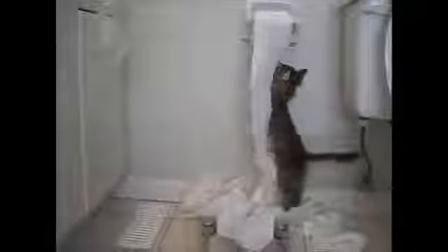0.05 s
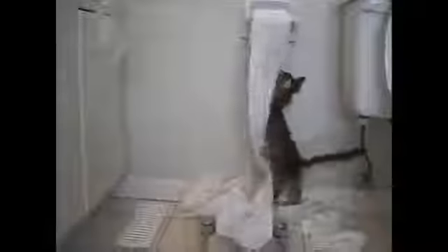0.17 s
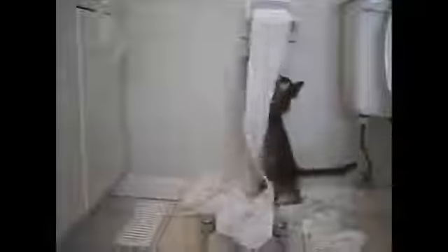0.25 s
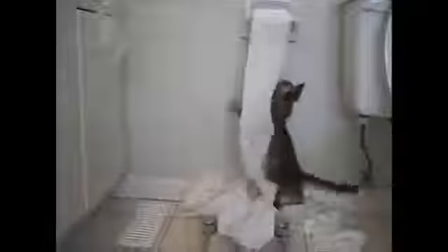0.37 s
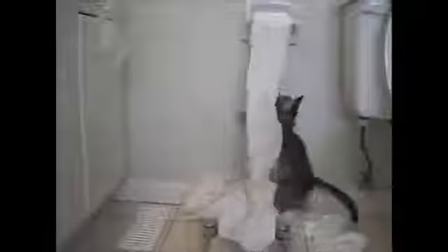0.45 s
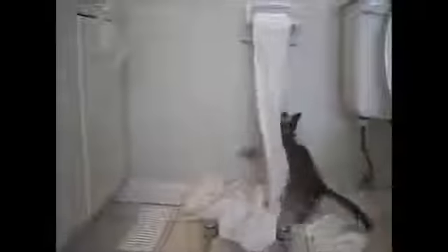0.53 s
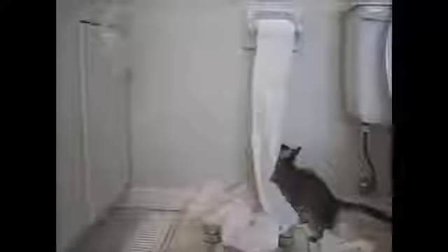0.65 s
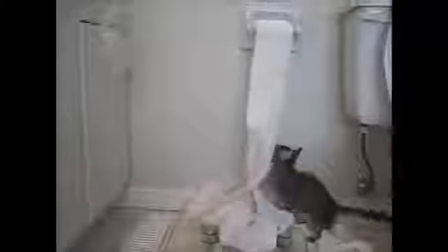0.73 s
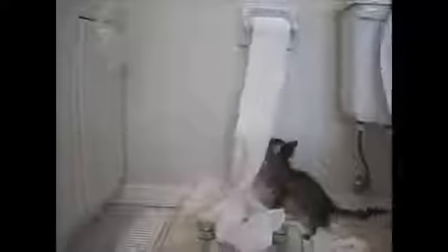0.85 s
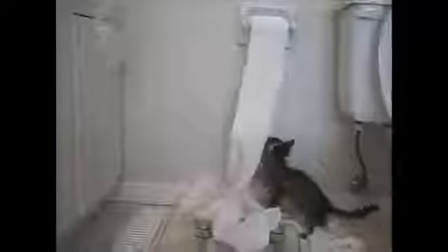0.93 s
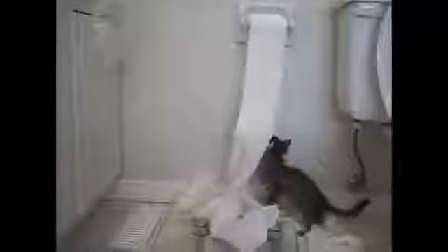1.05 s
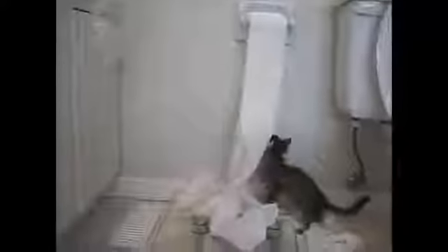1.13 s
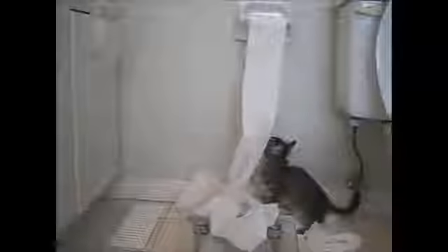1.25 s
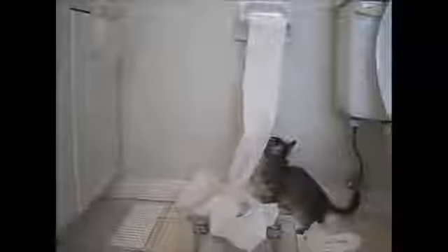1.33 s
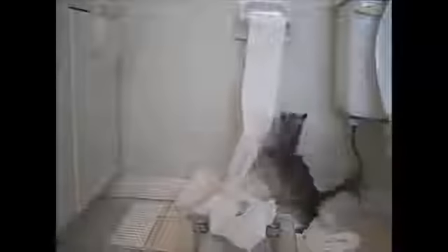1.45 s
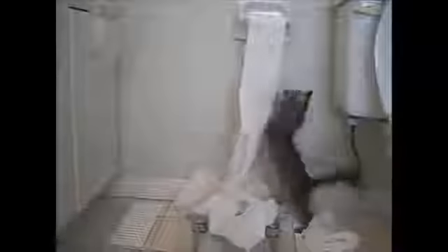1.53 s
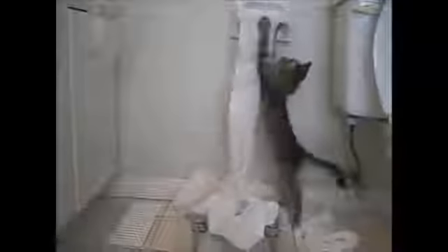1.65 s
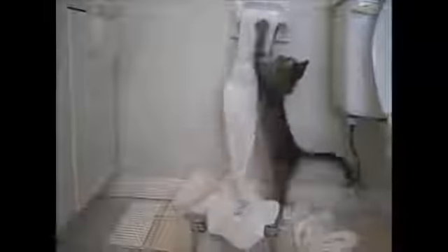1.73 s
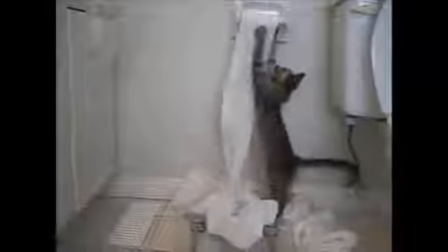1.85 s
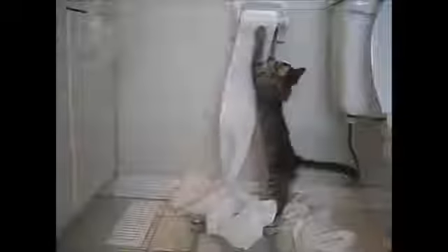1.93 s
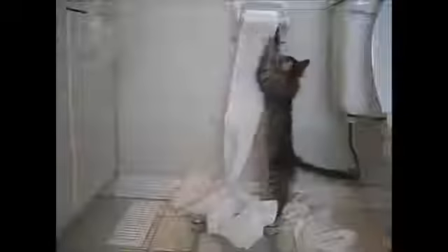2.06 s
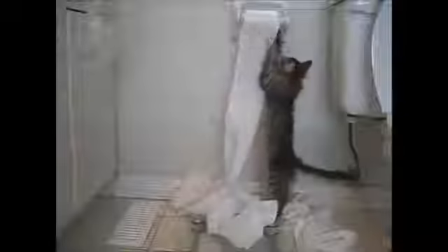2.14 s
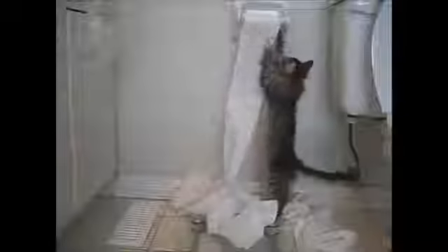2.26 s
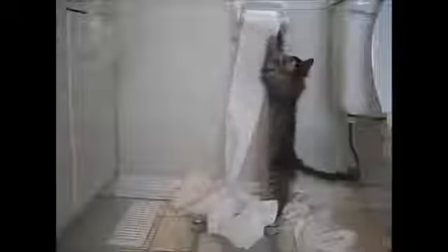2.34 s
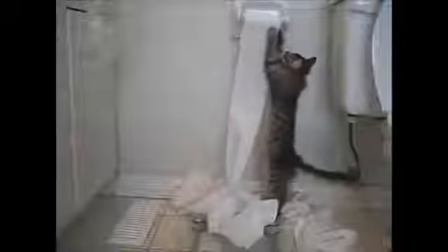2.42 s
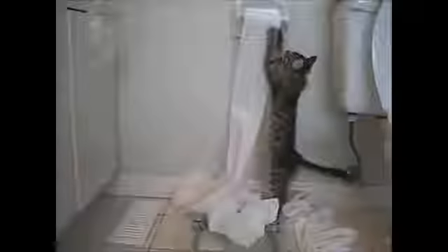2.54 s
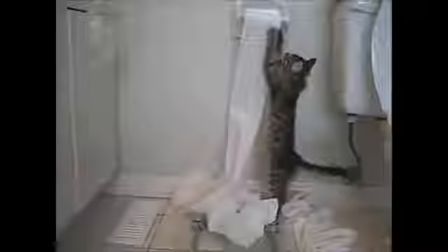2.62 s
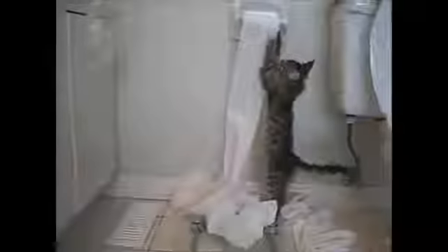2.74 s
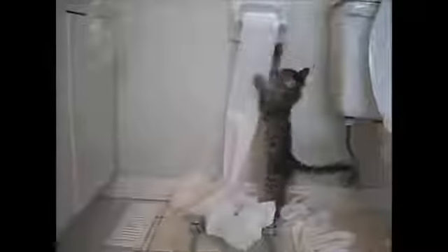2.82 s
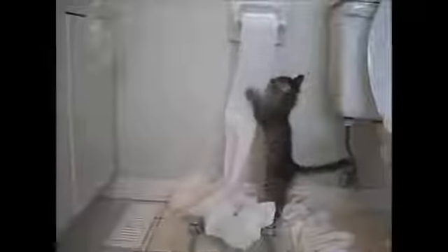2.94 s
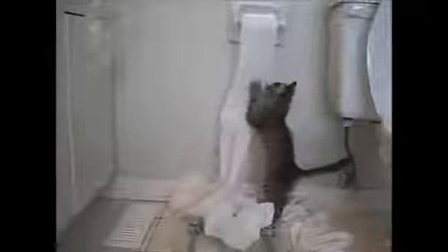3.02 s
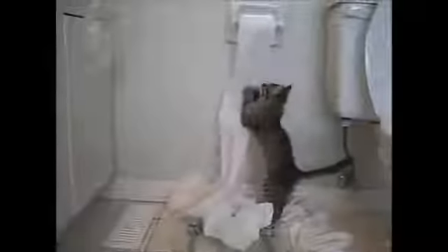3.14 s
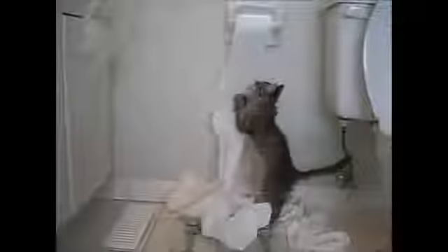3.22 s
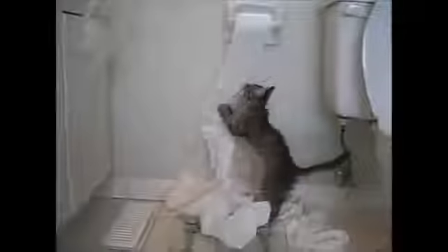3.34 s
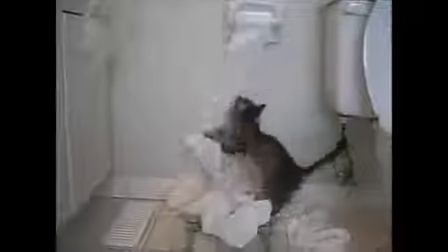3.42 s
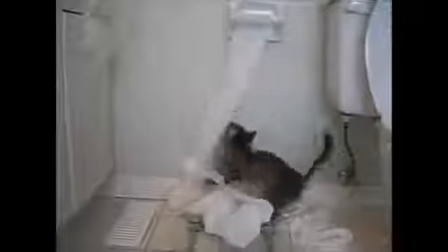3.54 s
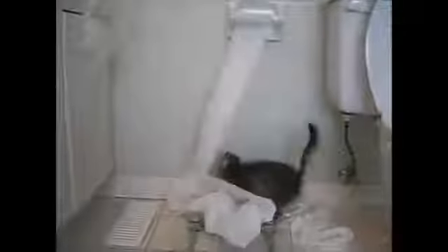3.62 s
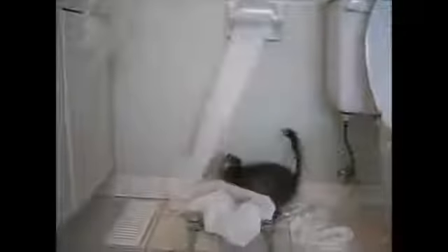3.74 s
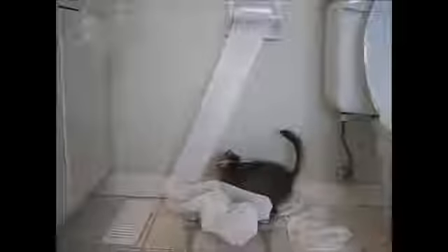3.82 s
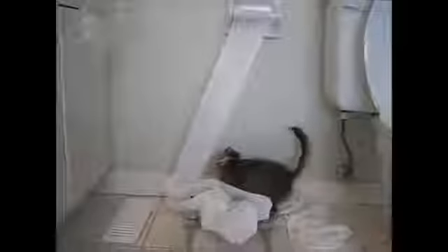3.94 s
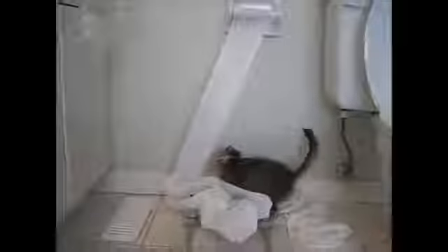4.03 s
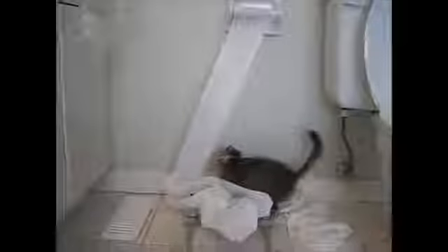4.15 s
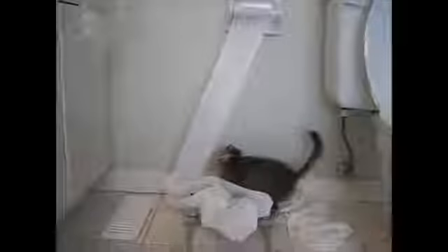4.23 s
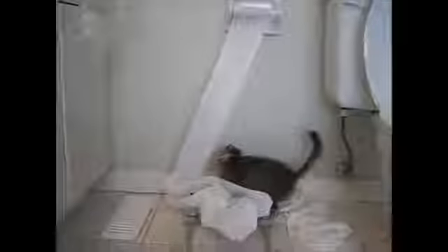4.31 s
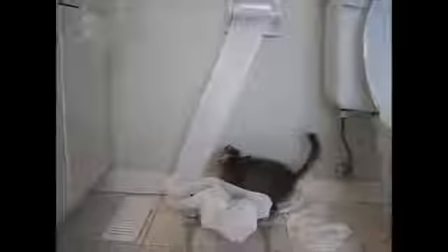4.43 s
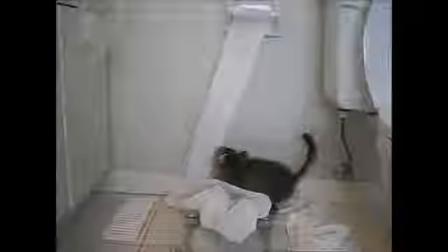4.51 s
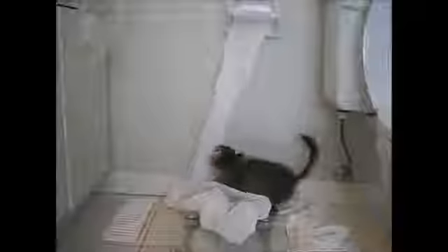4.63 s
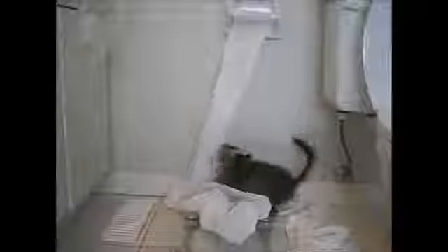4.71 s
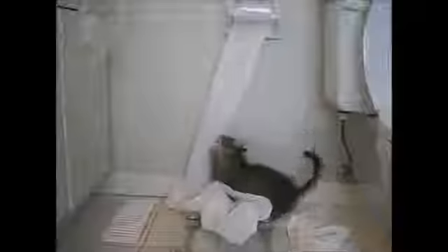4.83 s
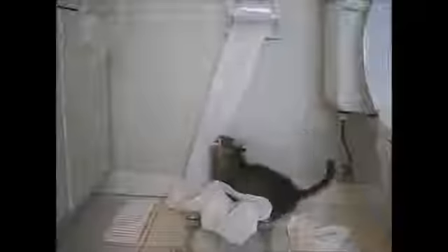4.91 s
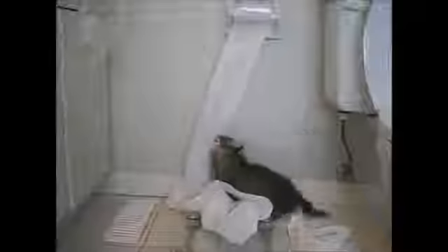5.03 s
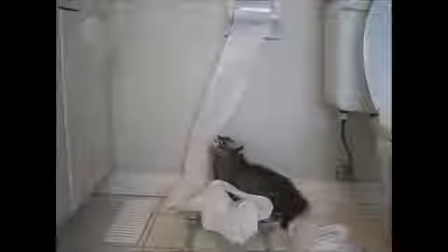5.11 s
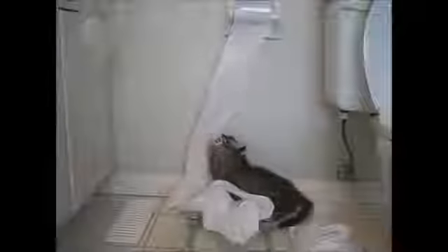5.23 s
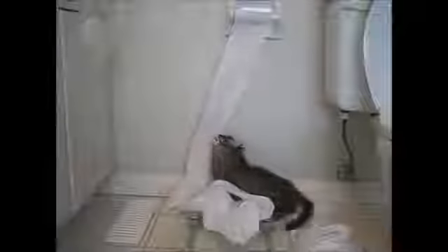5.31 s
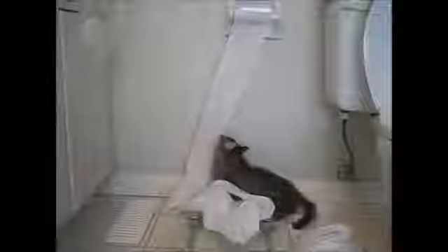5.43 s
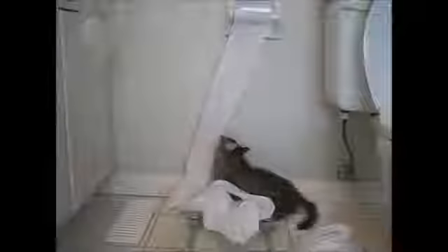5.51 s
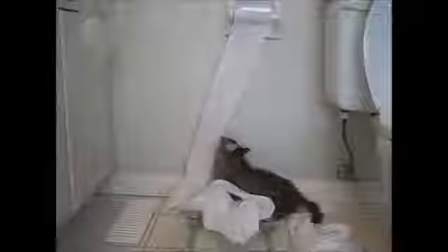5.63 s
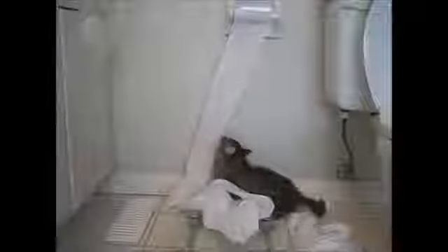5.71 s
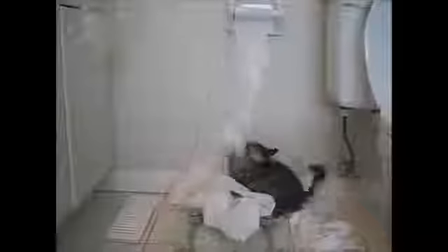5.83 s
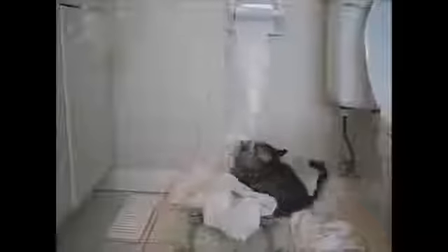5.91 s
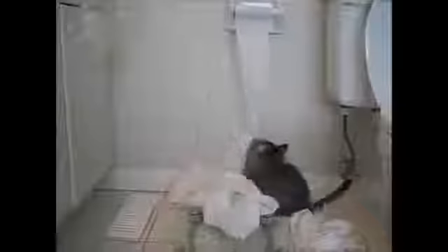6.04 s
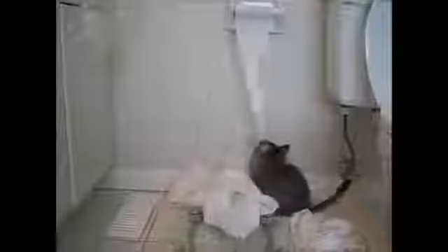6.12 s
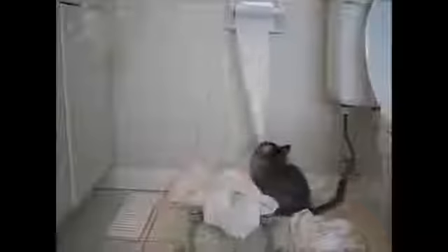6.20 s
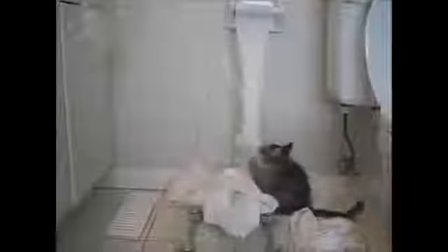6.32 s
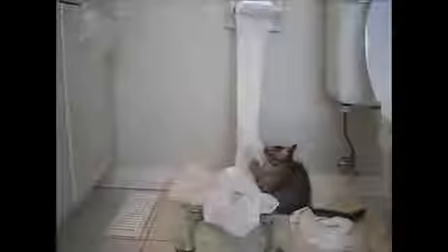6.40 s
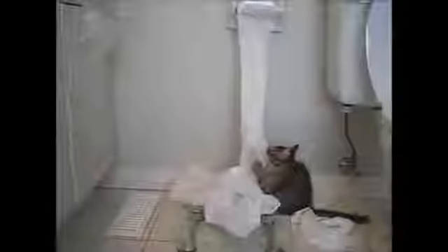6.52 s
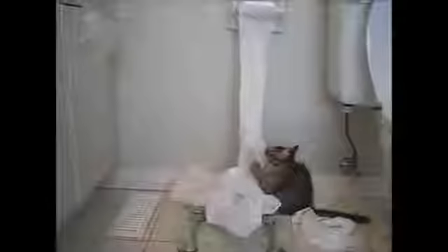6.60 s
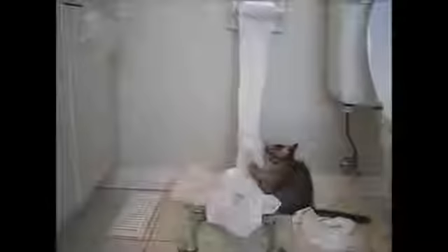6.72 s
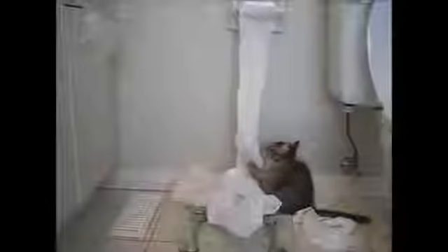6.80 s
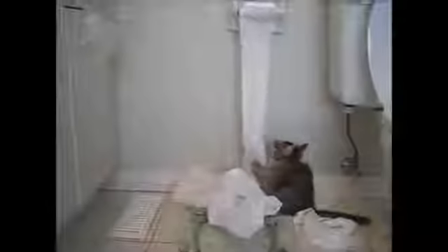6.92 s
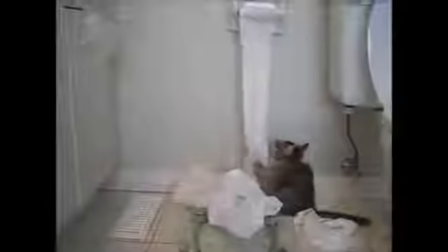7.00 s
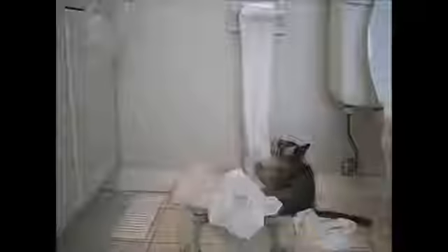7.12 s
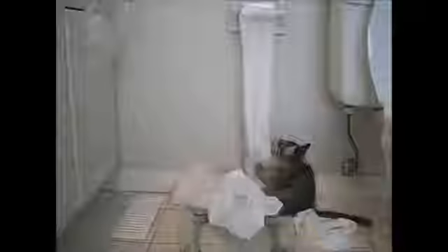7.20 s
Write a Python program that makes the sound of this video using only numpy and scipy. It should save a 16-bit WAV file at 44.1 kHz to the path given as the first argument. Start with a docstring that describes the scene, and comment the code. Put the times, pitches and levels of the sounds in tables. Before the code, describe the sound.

A faint fan runs throughout a small, echoing tiled bathroom: soft moving air, a low whirr and a barely audible thin whine, heard in mono. From 0 to 0.2 seconds a cat's pull makes the toilet roll knock, rattle and rumble loudly on its holder, with hissing paper. Another swish, a floor pat and lighter knocks follow at 0.5-0.8, then quiet little turns. Sharp clacks and a bright rattle hit at 1.7, then paper swishes near 2.0 and a knock at 2.15. Small ticks lead to a bright clack at 2.86. From 3.1 the roll stirs again, building to a clattering pull at 3.45-3.65. It fades into near quiet. Slight tissue rustles begin at 4.5 and return at 5.3. From 5.75 to 7 the heap crackles more busily, with crisp creases, soft padding, dull pats and faint holder tugs, then only the fan remains.

```python
"""Cat unrolling toilet paper

A cat unrolls toilet paper in a small tiled bathroom, then paws at the loose pile on the floor.
Each pull spins the roll, heard as filtered grains and noise; its knocks are short bursts through resonances.
The tissue hisses and crinkles in many bands of random snaps, with single sharp creases on top.
Hard walls ring after these sounds as fading noise, over the faint whirr of a fan made of filtered noise."""
import sys
import numpy as np
from scipy import signal
from scipy.fft import rfft, irfft, next_fast_len
from scipy.io import wavfile
from scipy.ndimage import map_coordinates

SR = 44100
rng = np.random.default_rng(int(sys.argv[2]) if len(sys.argv) > 2 else 0)


def materialize(psi):
    """Save the field psi as 16-bit PCM at rate SR to the path in sys.argv[1].

    A 1-D psi becomes a single channel; in a 2-D psi each row is a channel.
    """
    bounded = np.clip(np.atleast_2d(psi).T, -1, 1)
    quanta = np.round(bounded * 32767).astype(np.int16)
    wavfile.write(sys.argv[1], SR, quanta)


N = 320166  # length of the sound in samples

# Every level in the tables is relative: the function that plays it adds a gain of its own.
# the roll strikes its holder: start_s, spindle_db, tube_db, bracket_db
HOLDER_KNOCKS = [(0.0447, -16.5, -21.5, -21.5), (0.0731, -26, -26, -22.5), (0.1481, -26, -43, -31),
                 (0.189, -23.5, -31.5, -46), (0.594, -28.5, -34.5, -29.5), (0.7203, -33.5, -41, -29),
                 (0.7286, -23, -26.5, -30.5), (1.6671, -28, -32, -34), (1.6818, -13.5, -26.5, -22),
                 (1.6849, -16, -39, -22), (1.743, -20.5, -21.5, -23.5), (2.1553, -16.5, -45, -37.5),
                 (2.4795, -36.5, -44, -58), (2.579, -39, -55, -63), (2.597, -36.5, -64, -65),
                 (2.6125, -38.5, -49, -59), (2.718, -38, -48, -66), (2.85, -25, -39, -38),
                 (2.8643, -35, -34.5, -17), (2.8743, -39, -49, -15.5), (3.1804, -38.5, -33, -43),
                 (3.2537, -41, -37, -41), (3.3193, -48, -29, -42), (3.3647, -31.5, -43, -34.5),
                 (3.4178, -38, -35, -36.5), (3.465, -29, -28.5, -37), (3.4954, -16, -32, -45),
                 (3.54, -17.5, -29, -20), (3.5536, -26, -24.5, -27), (4.8626, -50, -70, -52)]
# resonances of the roll and its holder: pitch_hz, width_hz, level_db
THUD_MODES = [(159.4, 95, -10), (228, 51, -6.5), (382, 60, -1.5), (545, 68, 2.5), (950, 234, 2)]
# resonances of the cardboard tube: pitch_hz, width_hz, level_db
TUBE_MODES = [(1170, 170, -7), (1370, 120, 0), (2500, 140, -11)]
# resonances of the bracket: pitch_hz, width_hz, level_db
BRACKET_MODES = [(1550, 240, 0.5), (1907, 217, 3.5), (2580, 400, -3.5), (3115, 53, 3)]
# resonances of the spring-loaded spindle: pitch_hz, width_hz, level_db
SPINDLE_MODES = [(4020, 260, 0), (4620, 300, -3), (5490, 220, -2), (5800, 150, -4), (6120, 150, -4)]
# colour of the crack in a knock: pitch_hz, level_db (per Hz)
CRACK_COLOUR = [(300, -26), (2000, -6.5), (3500, 13), (5300, 0), (7500, 4), (10000, 5), (15000, -12)]
# the crack follows the spindle's share of a blow, the thud the tube's and the bracket's
CRACK_DB, THUD_DB = -19.5, -17.5

# the roll is set spinning: start_s, driven_s, tumble_db, tube_rub_db, spindle_rattle_db
ROLL_SPINS = [(0.0, 0.042, -42, -53, -68), (0.046, 0.028, -24.5, -45, -33), (0.18, 0.097, -37.5, -47, -57),
              (0.5, 0.23, -45, -62, -68), (0.65, .07, -39.5, -50, -66), (0.725, 0.061, -36, -34, -52),
              (1.035, 0.018, -50, -43, -75), (1.2, 0.067, -55.5, -58, -87), (1.42, .18, -54, -76, -68),
              (1.686, 0.12, -40, -47, -26.5), (1.995, 0.074, -56, -52, -66),
              (2.155, 0.039, -45.5, -54, -65), (2.47, .03, -55, -56, -68), (2.74, 0.051, -50, -55, -72),
              (2.864, 0.019, -35, -50, -61), (3.12, 0.25, -50.5, -48.5, -70), (3.32, 0.23, -44.5, -45, -58),
              (3.468, .05, -36, -29, -39), (3.53, 0.12, -31, -36, -30)]
# the roll slows a little while driven, then coasts to rest; the rattle settles sooner
SPIN_ATTACK_S, SPIN_SAG_DB = 0.0042, 5
COAST_DB_PER_S, RATTLE_STOP_DB_PER_S = 128, 225
# colour of the tumbling roll: pitch_hz, level_db (per Hz)
TUMBLE_COLOUR = [(20, -36), (45, -18), (90, -5), (160, -2.5), (280, -3.5), (560, 3), (750, -0.5),
                 (1000, 0.5), (1400, 2), (2100, -6.5), (4300, -5.5), (6000, -15), (7500, -15), (15000, -28)]
# colour of the spindle's rattle: pitch_hz, level_db (per Hz)
RATTLE_COLOUR = [(200, -12), (450, -8.5), (580, 5.5), (750, -2.5), (1200, 0.5), (2200, 2.5), (3200, -6),
                 (4200, 1), (5500, 2), (6400, -7), (7500, -52), (15000, -42)]
# claws drag the sheet off the roll: start_s, length_s, hiss_db
SHEET_DRAGS = [(0.045, 0.15, -48), (0.43, 0.069, -63), (0.488, 0.16, -46.5), (0.66, 0.1, -53),
               (0.78, 0.2, -63), (1.405, 0.087, -56), (1.53, 0.16, -62), (1.675, 0.2, -44),
               (1.945, 0.06, -43), (1.985, .098, -39), (2.44, 0.068, -56), (2.54, 0.079, -57.5),
               (2.735, 0.021, -46), (2.845, 0.015, -39.5), (3.1, 0.053, -56), (3.19, 0.21, -62.5),
               (3.345, 0.2, -48.5), (3.5, 0.08, -33.5), (3.58, 0.095, -37), (3.74, 0.17, -60)]
# the sheet gathers speed until the claws let go
DRAG_ATTACK_S, DRAG_SWELL_DB, DRAG_RELEASE_DB_PER_S = 0.02, 4, 416
# colour of the sliding sheet: pitch_hz, level_db (per Hz)
SHEET_COLOUR = [(88, -47.5), (150, -14.5), (649, -13), (701, -14), (1250, -3), (1770, -10), (2270, -3.5),
                (2450, -5), (4810, -5.5), (10800, -13.5), (15000, -20)]
# the taut sheet tugs at the holder: start_s, length_s, bracket_db, tube_db, spindle_db
HOLDER_TUGS = [(5.8, 0.31, -48, -59, -54), (6.3, 0.19, -57, -48, -44), (6.6, 0.24, -62, -54, -51)]

# a paw stirs the heap on the floor: start_s, length_s, rustle_db, padding_db
HEAP_STIRS = [(4.465, 0.12, -47.5, -58), (4.62, 0.5, -56.5, -63.5), (5.28, .08, -54, -55.5),
              (5.42, 0.19, -61.5, -77), (5.762, 0.042, -45, -63), (5.86, .14, -49.5, -61),
              (6.01, 0.18, -46, -53), (6.22, 0.14, -48, -49.5), (6.335, 0.066, -37, -43.5),
              (6.44, 0.13, -47.5, -52), (6.6, .09, -46.5, -61), (6.69, 0.069, -47, -59.5),
              (6.78, 0.044, -50.5, -51), (6.88, 0.11, -63, -78)]
# the tugs share these settings with the stirs
STIR_ATTACK_S, STIR_SWELL_DB, STIR_RELEASE_DB_PER_S = 0.024, -1, 195
# colour of the rustling heap: pitch_hz, level_db (per Hz)
HEAP_COLOUR = [(290, -36), (500, -3.5), (871, 1.5), (2020, -1.5), (2230, 1), (2430, -2), (3990, -2),
               (6670, -8.5), (11000, -10), (15000, -20)]
# colour of the padding paws: pitch_hz, level_db (per Hz)
PADDING_COLOUR = [(20, -45), (60, -22), (110, -21), (160, -5.5), (260, -12), (500, -2), (900, -15),
                  (2000, -17.5)]
# the sharpest creases of the tissue buckle: start_s, level_db
SHARP_CREASES = [(2.7569, -28.5), (3.14, -30), (4.5605, -29.5), (5.7692, -31.5), (5.784, -28),
                 (5.8013, -22), (6.2621, -25.5), (6.288, -31), (6.335, -25), (6.482, -26), (6.4974, -28),
                 (6.554, -29.5), (6.61, -31), (6.6355, -25.5), (6.679, -26), (6.7126, -21.5), (6.7316, -27),
                 (6.811, -27.5), (6.8399, -35), (7.0268, -38.5)]
# smaller creases buckle by chance while the heap rustles, this far over the rustle on average
SMALL_CREASES_PER_S, SMALL_CREASE_DB, CREASE_SCATTER_DB = 14, 7, 7
# colour of a buckling crease: pitch_hz, level_db (per Hz)
CREASE_COLOUR = [(200, -41), (700, -7), (1400, 0), (2800, -1), (4100, 1), (5500, -1.5), (7500, -6.5),
                 (11000, -6.5), (15000, -13)]
# a paw pats the heap against the floor: start_s, pat_db, thump_db
HEAP_PATS = [(0.594, -25, -45), (5.332, -32, -67), (5.801, -33, -73), (6.172, -38.5, -56.5),
             (6.37, -27, -47), (6.386, -37, -46.5), (6.48, -37, -59), (6.712, -30, -57)]
# colour of a pat on the heap: pitch_hz, level_db (per Hz)
PAT_COLOUR = [(60, -33), (160, 0.5), (600, -0.5), (1200, 5.5), (3000, -6), (6000, -9), (15000, -29)]
# resonances of the floor under a paw: pitch_hz, width_hz, level_db
FLOOR_MODES = [(167.5, 16, 2), (252, 22, -3)]

# colour of the fan's moving air: pitch_hz, level_db (per Hz)
AIR_COLOUR = [(15, -43), (25, -9), (75, -11.5), (207, -15), (309, -12.5), (363, -19.5), (769, -17.5),
              (903, -8), (1060, -17), (1210, -15.5), (1500, -19), (6370, -23.5), (7890, -27),
              (15000, -33.5)]
# resonances of the fan's duct: pitch_hz, width_hz, level_db
DUCT_MODES = [(301.6, 34, -2), (915, 42, -2), (1144, 41, -9)]
# a thin steady whine: pitch_hz, width_hz, level_db
WHINE_MODES = [(7700, 31, 0)]
# how long the tiled room rings: pitch_hz, time_to_fall_60_db_s
ROOM_DECAY = [(120, 0.82), (300, 0.61), (700, 0.44), (1800, 0.41), (5000, 0.35), (13000, 0.35)]
# standing waves between the walls: pitch_hz, width_hz, level_db
STANDING_WAVES = [(159, 11, 3), (202, 8.7, -4)]
TOP_HZ = 15250  # nothing is heard above this


def knocks(count=3):
    """Each blow shares its force among the roll, its tube, the bracket and the spindle, then rebounds."""
    track = np.zeros(N)
    for s, spindle_db, tube_db, bracket_db in HOLDER_KNOCKS:
        blow = amp(spindle_db + CRACK_DB) * coloured(chatter(0.008), CRACK_COLOUR)
        blow += amp((tube_db + bracket_db) / 2 + THUD_DB) * rung(chatter(0.0042), THUD_MODES)
        blow += amp(tube_db - 15.5) * rung(chatter(0.0046), TUBE_MODES)
        blow += amp(bracket_db - 15) * rung(chatter(0.0022), BRACKET_MODES)
        blow += amp(spindle_db - 14) * rung(chatter(0.0035), SPINDLE_MODES)
        add(track, s, blow)
        for delay_s in rng.uniform(0.004, 0.022, count):  # the loose spindle bounces
            add(track, s + delay_s, amp(-22) * blow)
    return room(track, wet_db=-4, bass_db=8.5)


def roll():
    """The spinning roll, the sheet dragged from it and the tugs on its holder ring in the room together."""
    return room(spinning() + dragging() + tugging(), wet_db=-6, bass_db=5.5)


def spinning():
    """The lopsided roll rumbles, its tube rubs and its spindle rattles as it turns."""
    tumble, rub, _ = gestures(ROLL_SPINS, SPIN_ATTACK_S, -SPIN_SAG_DB, COAST_DB_PER_S)
    _, _, rattle = gestures(ROLL_SPINS, SPIN_ATTACK_S, -SPIN_SAG_DB, RATTLE_STOP_DB_PER_S)
    track = amp(-6.5) * tumble * coloured(grains(900, 3.3, smooth=0.5), TUMBLE_COLOUR)
    track += amp(-9.5) * rub * rung(grains(150, 3.0, smooth=0.4), TUBE_MODES)
    track += amp(-3.5) * rattle * coloured(grains(2000, 1.6, smooth=0.95), RATTLE_COLOUR)
    return track


def dragging():
    """The sheet hisses under the claws as many fibres catch and let go."""
    fibres = crinkle(2500, 4, smooth=0.8, clump_db=1.3)
    hiss, = gestures(SHEET_DRAGS, DRAG_ATTACK_S, DRAG_SWELL_DB, DRAG_RELEASE_DB_PER_S)
    return amp(3) * hiss * coloured(fibres, SHEET_COLOUR)


def tugging():
    """Tugs from the cat below travel up the sheet and shake the holder."""
    bracket, tube, spindle = gestures(HOLDER_TUGS, STIR_ATTACK_S, STIR_SWELL_DB, STIR_RELEASE_DB_PER_S)
    track = amp(-9.5) * bracket * rung(grains(300, 3, smooth=0.6), BRACKET_MODES)
    track += amp(-9.5) * tube * rung(grains(300, 3.3, smooth=0.41), TUBE_MODES)
    track += amp(-6.5) * spindle * rung(grains(180, 2.9, smooth=0.26), SPINDLE_MODES)
    return track


def pile():
    """Loose tissue crackles finely, single creases snap, and the paws pad and pat underneath."""
    rustle, padding = gestures(HEAP_STIRS, STIR_ATTACK_S, STIR_SWELL_DB, STIR_RELEASE_DB_PER_S)
    crackle = crinkle(350, 6, smooth=0.55, clump_db=2.6)
    track = amp(-4.5) * rustle * coloured(crackle, HEAP_COLOUR)
    track += amp(-6.5) * padding * coloured(grains(300, 8.7, smooth=0.72), PADDING_COLOUR)
    for s, db in SHARP_CREASES + small_creases(rustle):
        add(track, s, amp(db - 22) * crease())
    for s, pat_db, thump_db in HEAP_PATS:
        add(track, s, amp(pat_db - 20) * coloured(chatter(0.0078), PAT_COLOUR))
        add(track, s, amp(thump_db - 7) * rung(chatter(0.0019), FLOOR_MODES))
    return room(track, wet_db=0, bass_db=-2.5)


def crease():
    """One crease snaps, with extra sound around a pitch of its own."""
    snap = chatter(0.005)
    pitch_hz = 4500 * np.exp(0.73 * rng.standard_normal())
    return coloured(snap + fold(snap, pitch_hz, 0.8), CREASE_COLOUR)


def small_creases(rustle):
    """(start_s, level_db) of creases that buckle at random, harder where the heap is stirred harder."""
    chance, size = rng.random(N), rng.standard_normal(N)
    stirred = rustle > rustle.max() / 20
    at = np.flatnonzero((chance < SMALL_CREASES_PER_S / SR) & stirred)
    levels_db = 20 * np.log10(rustle[at]) + SMALL_CREASE_DB + CREASE_SCATTER_DB * size[at]
    return list(zip(at / SR, levels_db))


def fan():
    """Steady moving air whirring in its duct, and a thin steady whine besides."""
    air = amp(-60) * coloured(rng.standard_normal(N), AIR_COLOUR)
    whirr = amp(-62) * rung(rng.standard_normal(N), DUCT_MODES)
    whine = amp(-83) * rung(rng.standard_normal(N), WHINE_MODES)
    return air + whirr + whine


def room(x, wet_db, bass_db):
    """Direct sound plus the tiles' tail, which booms at the room's standing waves."""
    hz, t, noise = signal.stft(rng.standard_normal(SR), SR, nperseg=256)
    lift = amp(along([(200, bass_db), (4000, 0.0079)], hz))[:, None]
    fading = noise * amp(-60 * t / along(ROOM_DECAY, hz)[:, None])
    tail = signal.istft(fading * lift, SR, nperseg=256)[1]
    # the tail is scaled by its strength without the bass lift
    tail /= np.linalg.norm(signal.istft(fading, SR, nperseg=256)[1])
    tail = filtered(tail, lambda f: 1 + sum(resonance([mode], f) for mode in STANDING_WAVES))
    return x + amp(wet_db) * signal.fftconvolve(x, tail)[:N]


def chatter(length_s, size=2048):
    """One contact: a burst of tiny slips that swells quickly, then dies away within about twice length_s."""
    t = np.arange(size) / SR
    burst = rfft(rng.standard_normal(size) * np.exp(-(t / length_s) ** 4))
    # a hard contact drives all frequencies about equally
    even = irfft(burst / np.abs(burst) ** 0.5, size)
    return even * (1 - np.exp(-t / 0.0009)) * np.exp(-(t / length_s / 2) ** 4)


def grains(per_second, spread_db, smooth):
    """Random tiny snaps of uneven size on a share of smooth friction noise."""
    snaps = (rng.random(N) < per_second / SR) * np.sign(rng.standard_normal(N))
    sizes = amp(spread_db * np.clip(rng.standard_normal(N), -2, 2))
    return unit(snaps * sizes) + smooth * rng.standard_normal(N)


def crinkle(per_second, spread_db, smooth, clump_db, count=7):
    """Folds of many sizes buckle in clumps, each size in its own part of the spectrum."""
    total = np.zeros(N)
    for pitch_hz in np.geomspace(250, 14000, count):
        snaps = grains(per_second, spread_db, smooth)
        clumped = snaps * amp(clump_db * wobble(60))
        total += fold(clumped, pitch_hz, 0.5)
    return unit(total)


def fold(x, hz, octaves):
    """x as radiated by one fold of tissue, whose size sets its pitch: a bell-shaped band around hz."""
    return filtered(x, lambda f: np.exp(-0.5 * (np.log2((f + 1) / hz) / octaves) ** 2))


def gestures(rows, attack_s, swell_db, release_db_per_s):
    """One gain curve for each level column after start_s and length_s: attack, swelling hold, release."""
    age = np.arange(SR) / SR  # each gesture lasts at most one second
    total = np.zeros((len(rows[0]) - 2, N))
    for s, length_s, *levels in rows:
        hold_db = swell_db * (np.minimum(age / length_s, 1) - 0.5)
        release_db = release_db_per_s * np.maximum(age - length_s, 0)
        shape = np.minimum(age / attack_s, 1) * amp(hold_db - release_db)
        for power, db in zip(total, levels):
            add(power, s, (amp(db) * shape) ** 2)  # overlapping gestures add as power
    return np.sqrt(total)


def wobble(per_second):
    """A smooth random curve through per_second random points each second."""
    knots = rng.standard_normal(int(N * per_second / SR) + 4)
    return map_coordinates(knots, [np.arange(N) * per_second / SR])


def resonance(modes, f):
    """The response of things that ring, each mode a peak in opposite phase to the one before."""
    total = 0
    for k, (centre, width, db) in enumerate(modes):
        peak = 1j * f * width / (centre ** 2 - f ** 2 + 1j * f * width)
        total = total + (-1) ** k * amp(db) * peak
    return total


def rung(x, modes):
    """x through a set of resonances, at rms 1."""
    return unit(filtered(x, lambda f: resonance(modes, f)))


def coloured(x, spectrum):
    """x with the given colour, at rms 1."""
    return unit(filtered(x, lambda hz: amp(along(spectrum, hz))))


def filtered(x, response):
    """x times a response of frequency."""
    size = next_fast_len(len(x) + 4096)  # spare room for the ringing
    spectrum = rfft(x, size) * response(np.fft.rfftfreq(size, 1 / SR))
    return irfft(spectrum, size)[:len(x)]


def along(points, hz):
    """(pitch_hz, value) points read on a log axis."""
    f, v = np.transpose(points)
    return np.interp(np.log(hz + 1), np.log(f + 1), v)


def amp(db):
    """Decibels to gain."""
    return 10 ** (np.asarray(db) / 20)


def unit(x):
    """x scaled to rms 1."""
    return x / np.sqrt(np.mean(x ** 2) + 1e-20)


def add(track, s, sound):
    """Mixes a sound into the track at time s in seconds."""
    part = track[max(round(s * SR), 0):][:len(sound)]
    part += sound[:len(part)]


def scene():
    """All sources added into one channel."""
    return (knocks() + roll() + pile() + fan())[None]


def record(dry):
    """Keeps nothing at or above the band limit."""
    return np.array([filtered(x, lambda hz: hz < TOP_HZ) for x in dry])


dry = scene()
out = record(dry)
materialize(out)
```